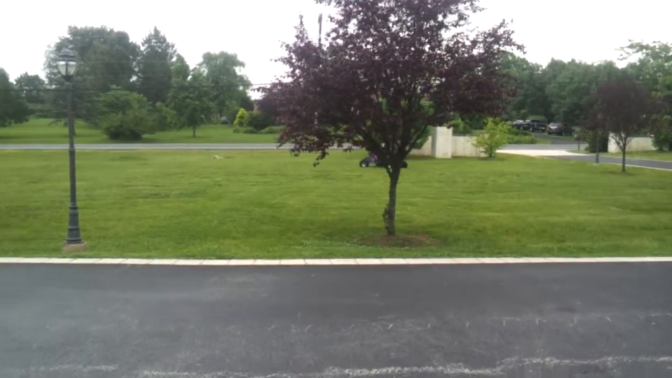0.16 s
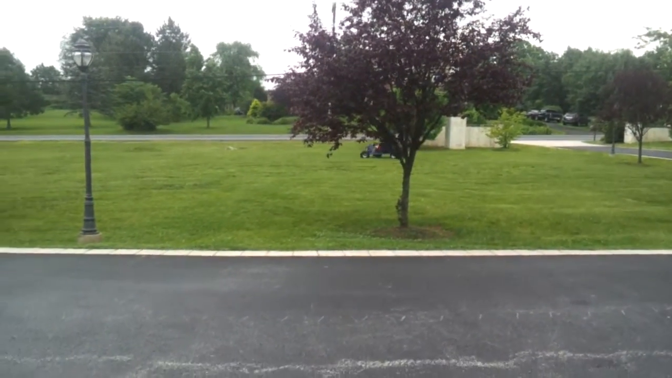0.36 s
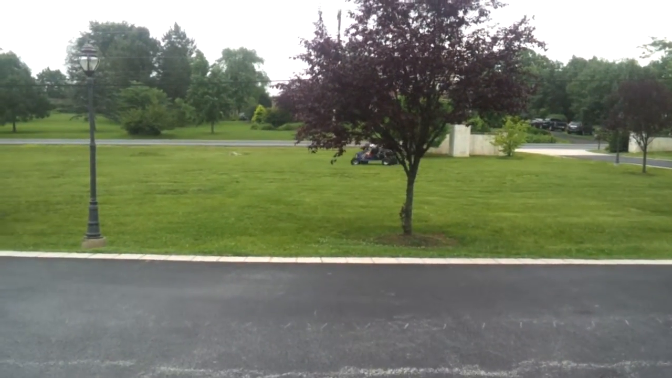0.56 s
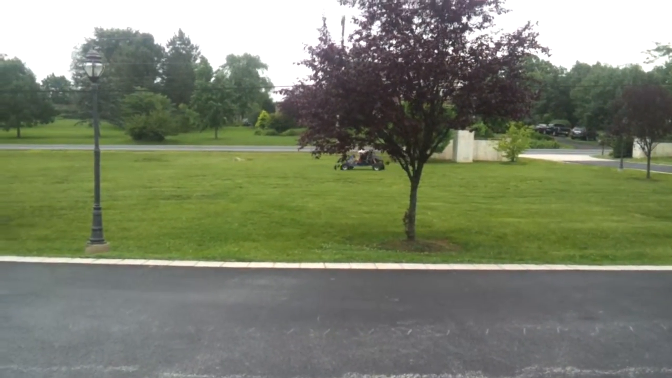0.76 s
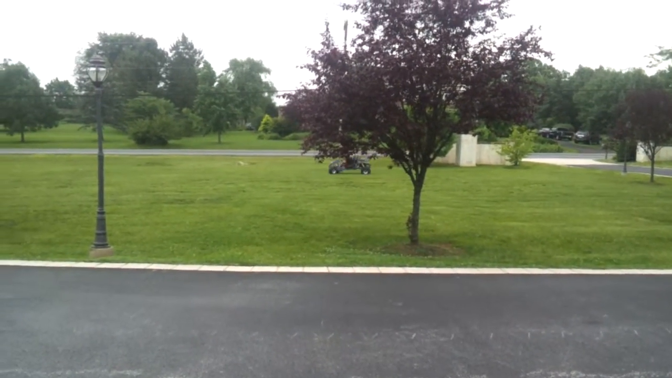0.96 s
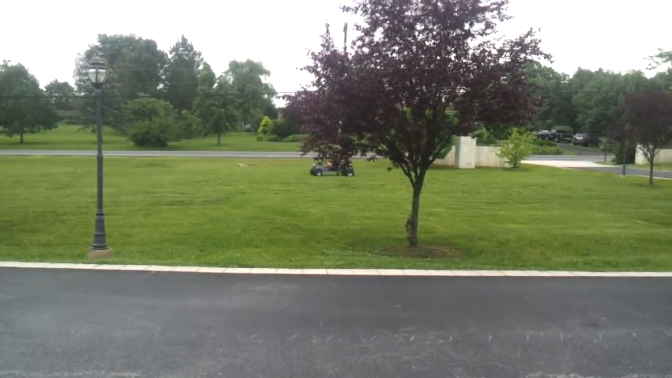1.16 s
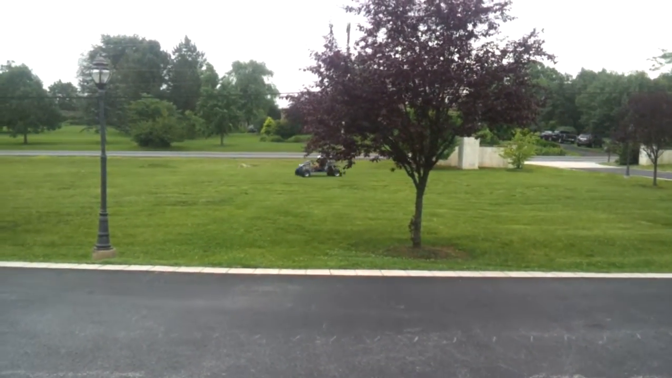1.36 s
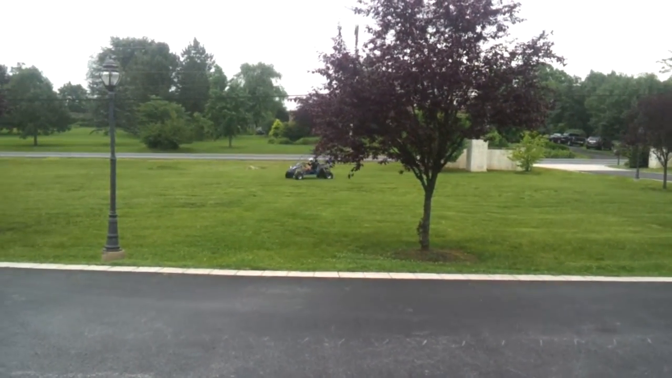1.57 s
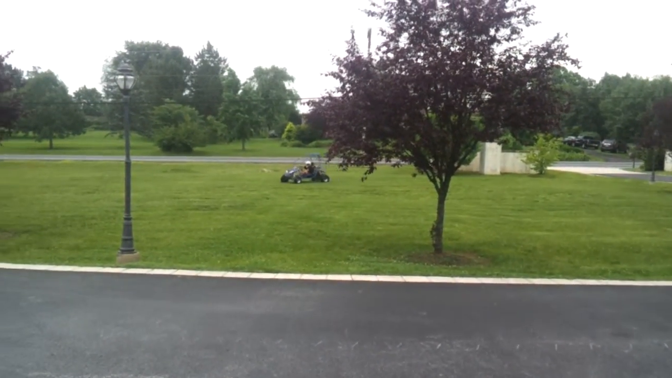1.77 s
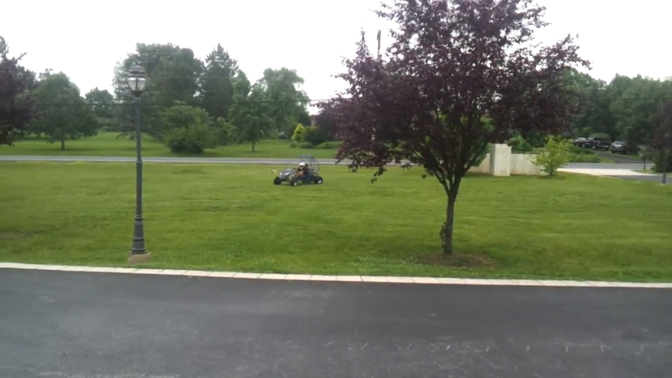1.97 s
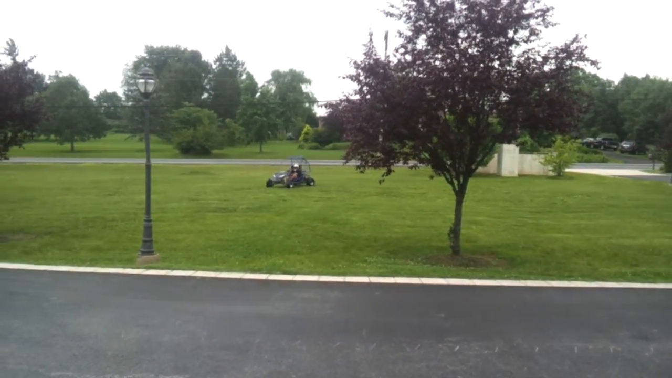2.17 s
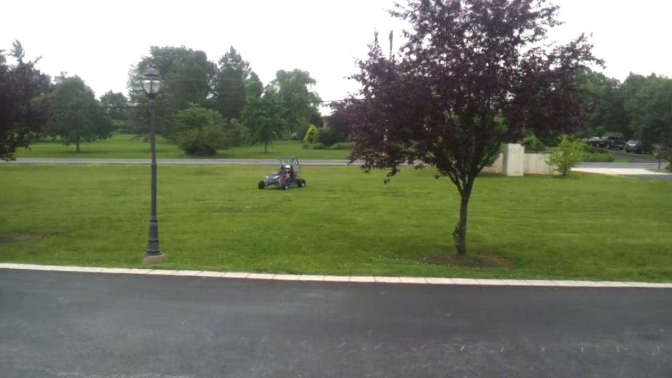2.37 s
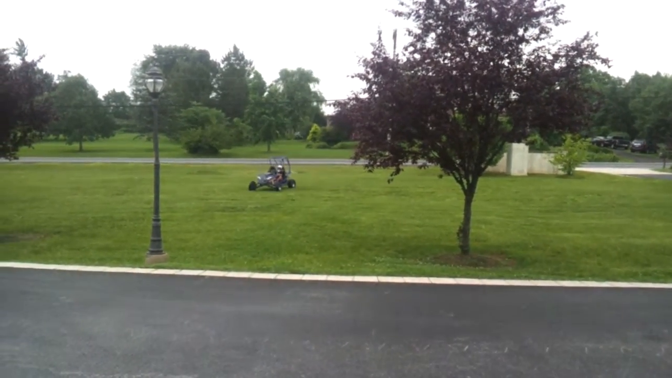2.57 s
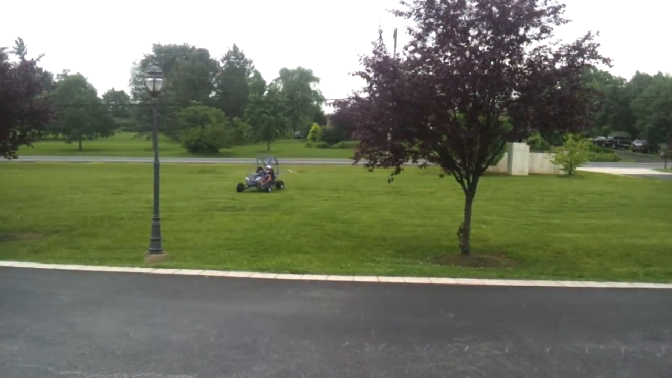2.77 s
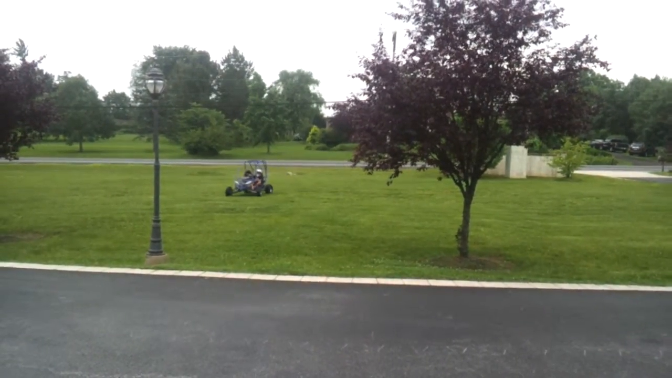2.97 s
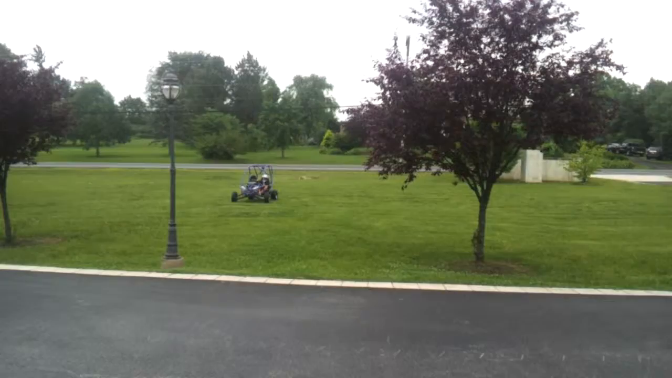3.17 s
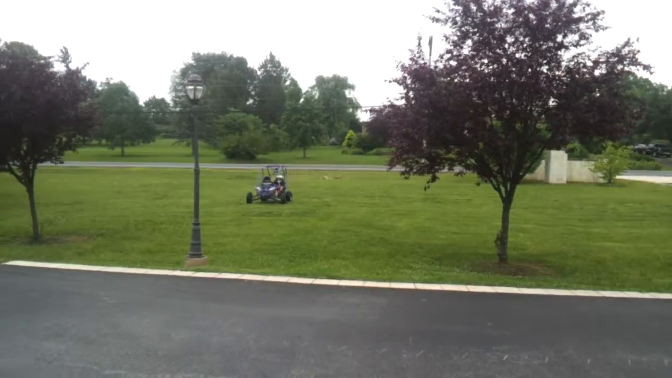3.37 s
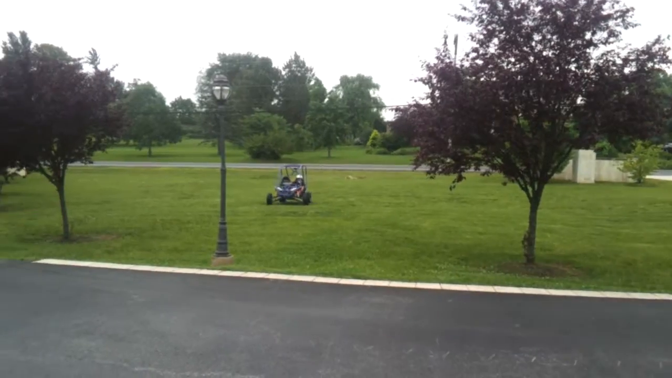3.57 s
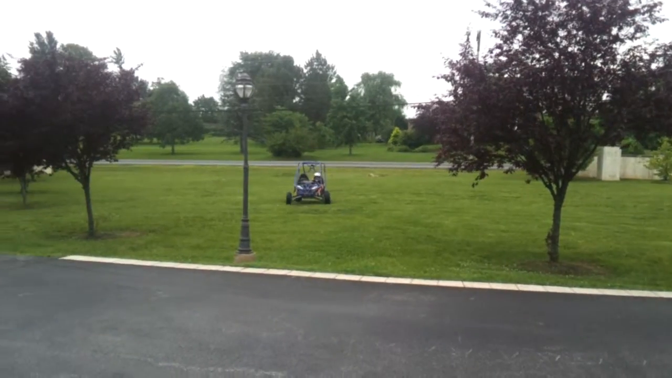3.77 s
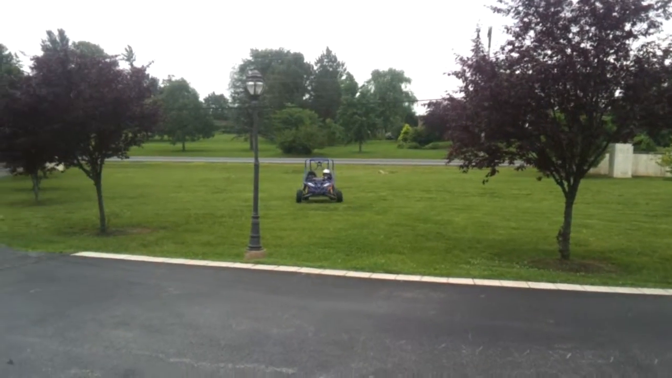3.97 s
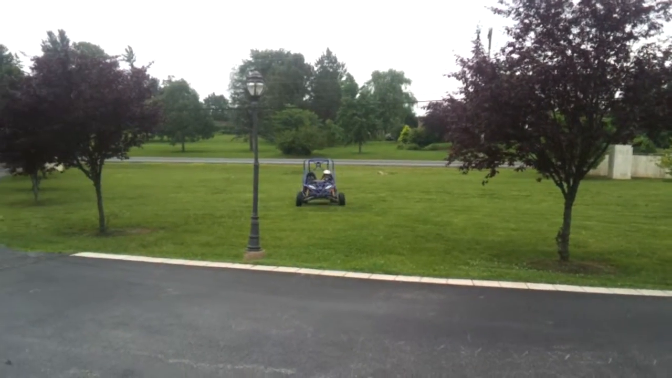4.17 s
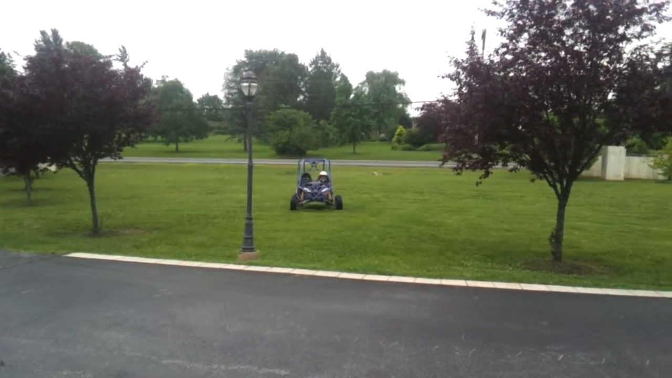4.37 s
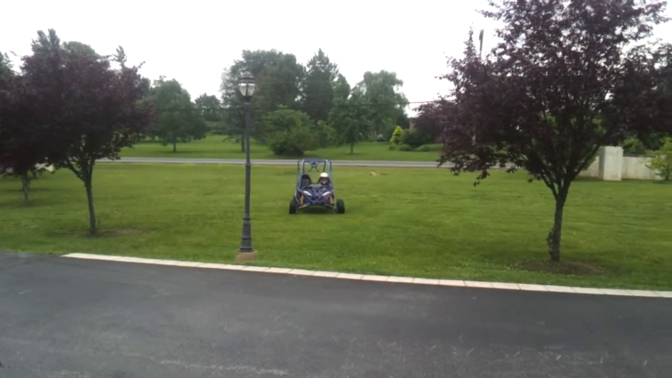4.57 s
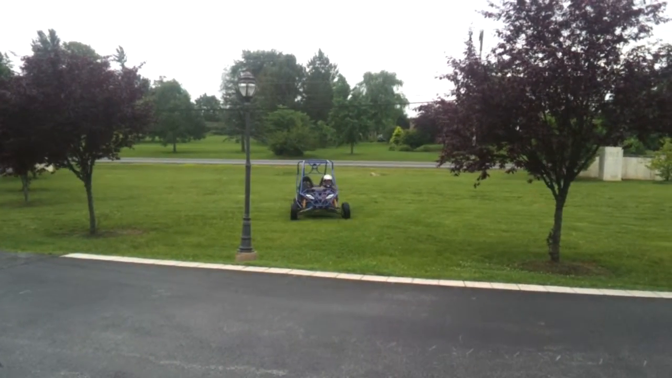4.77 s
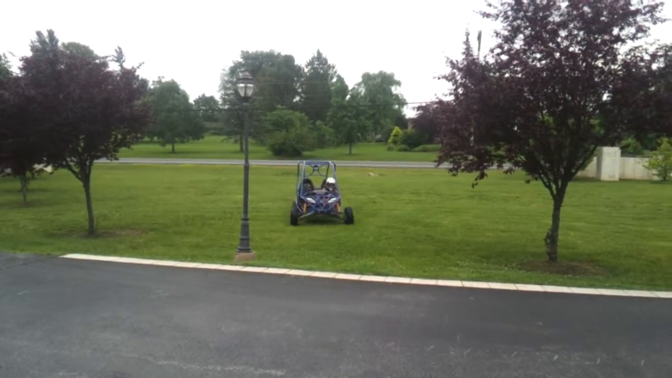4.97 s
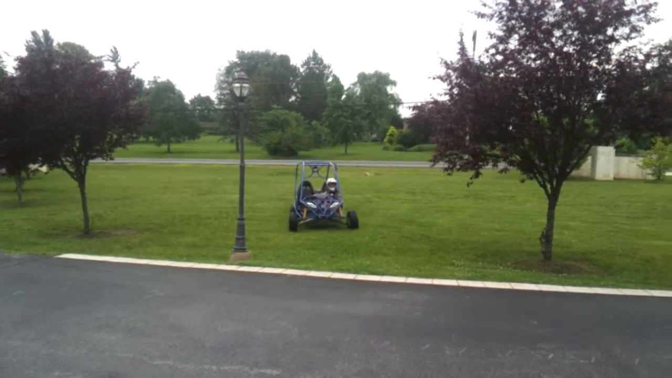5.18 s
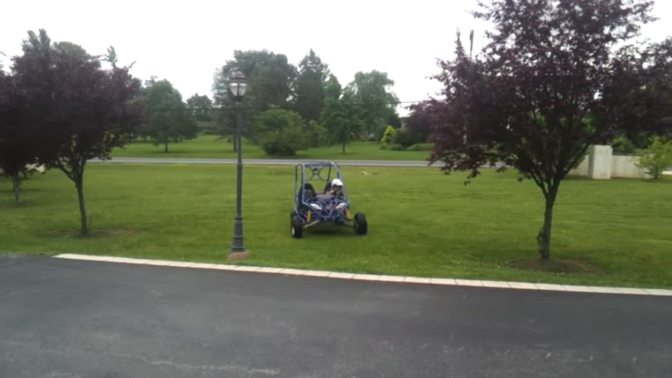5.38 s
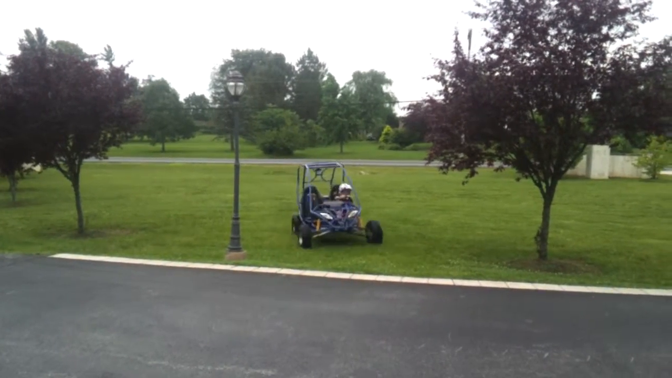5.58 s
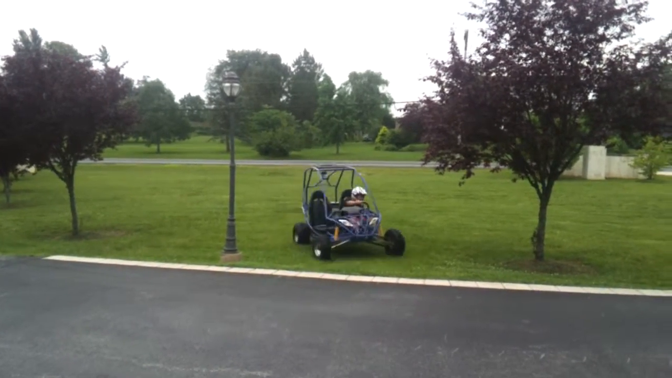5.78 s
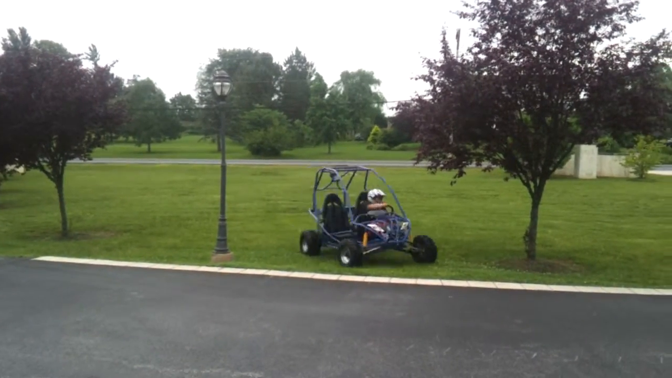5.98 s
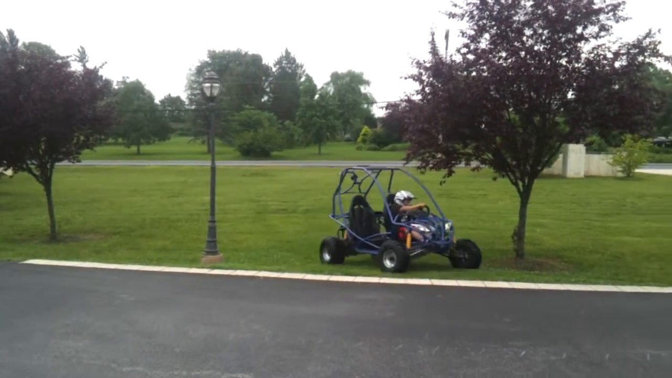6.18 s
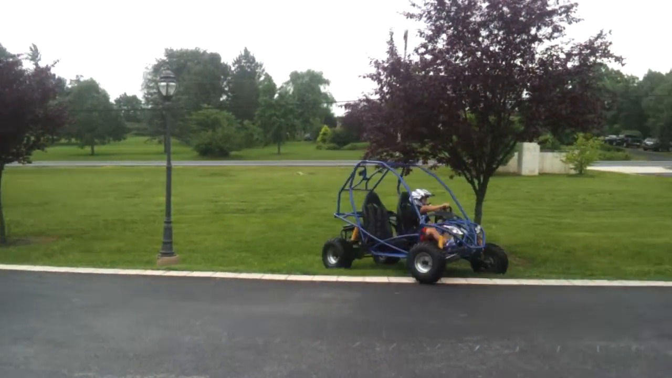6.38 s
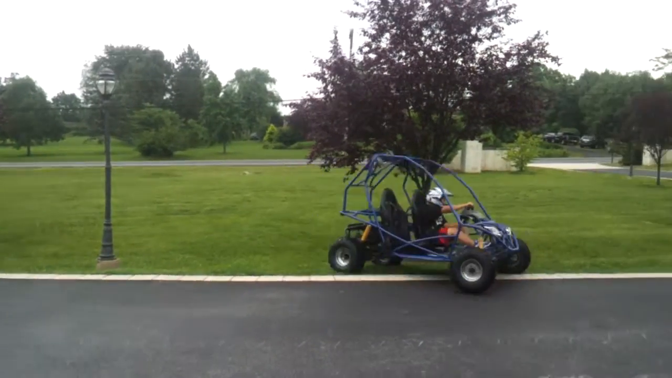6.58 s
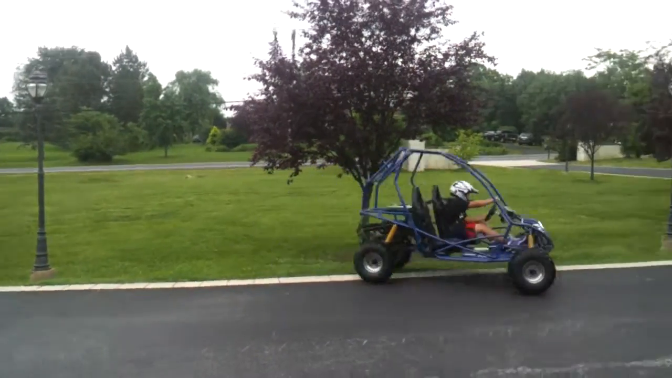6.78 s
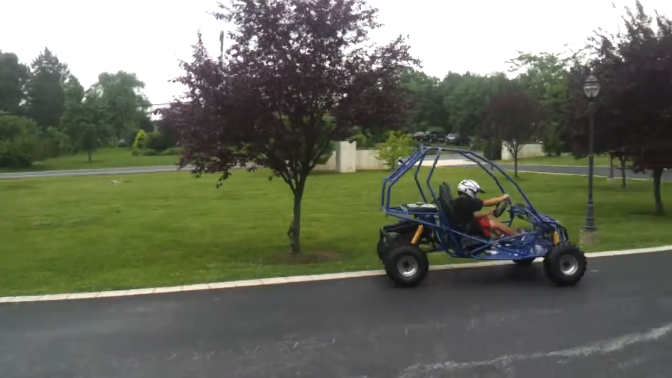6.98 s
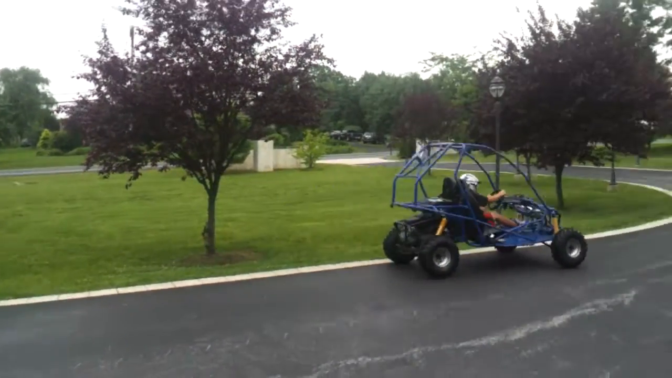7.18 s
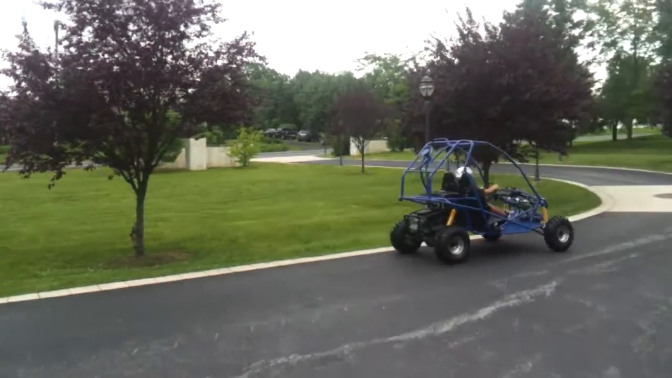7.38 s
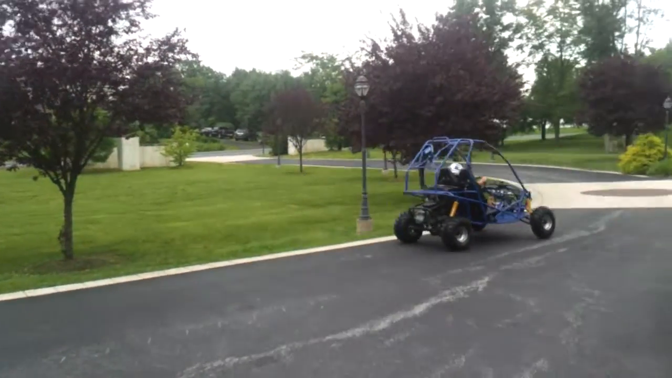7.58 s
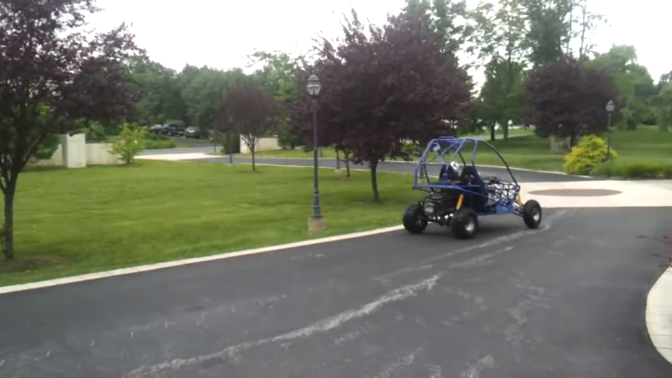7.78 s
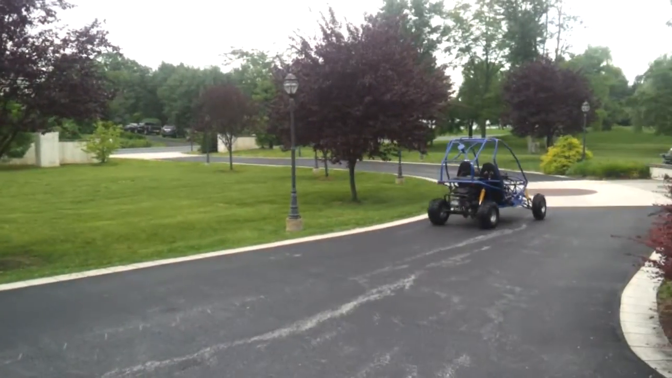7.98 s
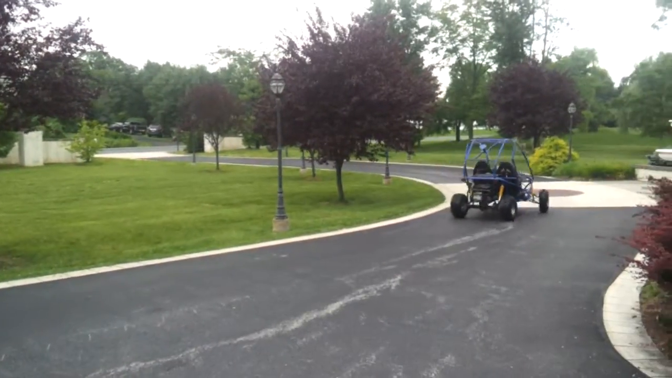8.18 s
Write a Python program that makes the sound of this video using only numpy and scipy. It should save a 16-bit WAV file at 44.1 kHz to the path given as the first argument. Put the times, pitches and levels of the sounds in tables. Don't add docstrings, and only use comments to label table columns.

```python
import sys
import numpy as np
from scipy import signal
from scipy.fft import rfft, irfft, next_fast_len
from scipy.io import wavfile
from scipy.ndimage import uniform_filter1d, map_coordinates

SR = 44100
rng = np.random.default_rng(int(sys.argv[2]) if len(sys.argv) > 2 else 0)


def boost_factor(decibels):
    exponent = np.asarray(decibels, float) / 20
    return 10 ** exponent


def transcribe(u):
    v = np.clip(np.atleast_2d(u).T, -1, 1)
    q = np.round(v * 32767).astype(np.int16)
    wavfile.write(sys.argv[1], SR, q)


N = 362943
STEP = 32

# time in seconds, loudness of its rush in dB,
# heading in degrees (0 = straight at the microphone).
COURSE = [(0, -38, -100), (.7, -38, -100), (1.0, -39.5, -91.5), (1.5, -39, -78), (2.6, -39.5, -53.5),
          (3.0, -41.5, -29), (3.9, -42, -13), (4.55, -39.5, -1), (4.8, -39.5, 3), (5.7, -36.5, 10),
          (6.1, -34, 33), (6.4, -34, 54), (6.7, -28, 82), (7.05, -27, 104), (7.25, -23, 126),
          (7.85, -26, 157.5), (8.05, -30, 164), (8.23, -33.5, 173)]
# time in seconds, share of knocks (0-1),
# boom of the body (0-1), pipe mouth in view (0-1).
FACING = [(0, .45, 0, 0.1), (.7, 0.4, 0, 0), (1.2, 0.15, 0.04, .3), (4.6, 0.15, 0.13, 0.48),
          (5.3, 0.32, 0.61, 0.24), (6.3, 0.57, 0.88, 0), (6.9, 0.32, .8, 0.13), (7.25, 0.62, 0.66, 0.29),
          (7.55, 0.57, 1, 0.7), (8, .45, .9, 0.82), (8.1, 0.6, 0.91, 0.14)]
# time in seconds, firing rate in Hz, effort in dB.
ENGINE = [(0, 45.46, -32.5), (.5, 45.9, -33.5), (.8, 44.63, -33), (1.24, 46.64, -32.5), (1.6, 46.84, -32.5),
          (2.0, 48.33, -31.5), (2.76, 50.57, -29), (2.86, 48.03, -29), (3.28, 47.38, -30.5),
          (3.47, 40.3, -33.5), (3.85, 43.12, -30.5), (3.99, 45.2, -30), (4.93, 47.82, -27.5),
          (6.13, 49.7, -24), (6.29, 46.74, -26), (6.85, 47.71, -21), (7.4, 48.32, -18.5), (8.0, 50.1, -22)]
# start in seconds, end in seconds, depth (0-1).
COASTS = [
    (.62, .74, 0.3),
    (.8, .87, 0.7),
    (2.86, 3.33, 0.75),
    (3.52, 3.87, 0.97),
    (4.76, 4.8, 0.6),
    (6.18, 6.8, 0.5),
]
# start in seconds, end in seconds, depth (0-1).
DRAGS = [
    (.38, .42, 0.4),
    (3.36, 3.46, 0.61),
    (4.62, 4.75, 0.75),
    (8.06, 8.4, 0.98),
]


def clock():
    return np.arange(0, N + STEP, STEP) / SR


def fine(slow):
    return np.interp(np.arange(N) / SR, clock(), slow)


def curves(rows):
    s, *cols = np.transpose(rows)
    return [np.interp(clock(), s, c) for c in cols]


def wobble(rate):
    knots = rng.standard_normal(int(N * rate / SR) + 4)
    return map_coordinates(knots, [clock() * rate])


def unit(x):
    return x / np.sqrt(np.mean(x ** 2) + 1e-20)


def filtered(x, response):
    m = next_fast_len(N + 8192)
    hz = np.fft.rfftfreq(m, 1 / SR)
    return irfft(rfft(x, m) * response(hz), m)[..., :N]


def coloured(x, spectrum, lo_hz=0, hi_hz=SR):
    hz, db = np.transpose(spectrum)

    def response(f):
        level_db = np.interp(np.log(f + 1), np.log(hz), db, -120, -120)
        return boost_factor(level_db) * (f >= lo_hz) * (f < hi_hz)

    return unit(filtered(x, response))


def ringing(x, hz, width):
    return unit(filtered(x, lambda f: (1j * f * width / (hz * hz - f * f + 1j * f * width)) ** 2))


def patchy(depth_db):
    z = signal.stft(rng.standard_normal(N + 512), nperseg=512)[2]
    field = uniform_filter1d(rng.standard_normal(z.shape), size=5, axis=0)
    field = uniform_filter1d(field, size=10, axis=1)
    return unit(signal.istft(z * boost_factor(depth_db * unit(field)), nperseg=512)[1][:N])


def pedal(spans):
    t = clock()
    change_s = 0.044
    return sum(depth * np.clip(np.minimum(t - a, b - t) / change_s + .5, 0, 1) for a, b, depth in spans)


def nearness():
    return np.clip((curves(COURSE)[0] + 38.2) / 8, 0, 1)


def seen(sides):
    side_headings = (-100, -60, 0, 120)
    return np.interp(curves(COURSE)[1], side_headings, sides)


def firing_hz():
    # time of the lowest speed in seconds, loss in %, slowing in seconds, recovery in seconds.
    ruts = [(.34, 8, .09, .14), (.6, 3, .09, .1), (.85, 3, .08, .05), (1.12, 1, .08, .1),
            (1.51, 2.5, .15, .12), (1.74, 2, .08, .11), (2.2, 2, .06, .06), (2.45, 2.5, .08, .06),
            (2.62, 4.5, .11, .12), (3.12, 2, .1, .1), (4.24, 1, .2, .2), (4.74, 14.5, .2, .19),
            (5.02, 9, .08, .14), (5.25, 4, .08, .09), (5.46, 3, .09, .08), (5.62, 6.5, .08, .16),
            (5.87, 5.5, .05, .16), (6.19, 1.8, .05, .09), (6.35, 4.5, .06, .45), (6.97, 7.5, .11, .1),
            (7.17, 3, .08, .08), (7.33, 4, .06, .1), (8.2, 13.5, .17, .5)]
    t = clock()
    loss = sum(np.interp(t, [s - fall, s, s + rise], [0, share, 0]) for s, share, fall, rise in ruts)
    return curves(ENGINE)[0] * (1 - loss / 100)


def crank():
    return 1.05 + np.cumsum(fine(firing_hz())) / SR + 0.0074 * fine(wobble(30))


def orders_db():
    # order, level against the effort in dB at each of the four headings.
    voice = [(2, -6.5, -4, -4, -4), (3, -9, -8, -9.5, -11.5), (4, -10, -10, -8.5, -10),
             (5, -4, -21, -10.5, -8.5), (6, -9.5, -11.5, -10, -9), (7, -20.5, -20.5, -11.5, -16)]
    # order, change coasting in dB, change dragged in dB.
    pedal_effect = [(2, -4, -11.5), (3, -14.5, 6), (4, -6.5, 2), (5, -0.5, -4.5), (6, -6.5, -6),
                    (7, -1.5, -0.5)]
    # time in seconds, order, change in dB, length in seconds.
    swells = [(.2, 4, 6, .1), (.87, 4, -12, .04), (1.85, 4, 4, 0.043), (2.06, 4, 2.5, .05),
              (2.16, 4, -15, .03), (2.36, 3, 7.5, 0.047), (2.75, 3, 4.5, .1), (2.4, 5, 1, .3),
              (1.6, 5, -4.5, 0.1), (.65, 5, -4.5, .08), (5.8, 6, 3, 0.062), (7.25, 2, 2.5, .15),
              (1.3, 2, 2.5, .25), (4.68, 3, -0.5, 0.044), (3.2, 4, 5.5, 0.07), (3.4, 7, 6.5, 0.085),
              (6.05, 4, -13, 0.073), (6.37, 5, 2, 0.071), (6.85, 4, 8.5, 0.057), (6.68, 3, -8.5, .06),
              (6.92, 3, -7, .07), (8.12, 3, 4, .05), (3.7, 5, 4.5, .1), (3.6, 2, 1, .08), (3.0, 3, -6, .08),
              (7.8, 4, 2.5, .15), (7.8, 7, 4, 0.098)]
    t, effort_db = clock(), curves(ENGINE)[1]
    coast, drag = pedal(COASTS), pedal(DRAGS)
    levels = []
    for (_, *sides), (_, coast_db, drag_db) in zip(voice, pedal_effect):
        levels.append(effort_db + seen(sides) + coast_db * coast + drag_db * drag)
    for s, order, db, length in swells:
        i = round(order) - 2
        levels[i] = levels[i] + db * np.exp(-.5 * ((t - s) / length) ** 2)
    return levels


def note(turns, near):
    # order, level against its common level in dB.
    crack = [(8, -8.5), (9, -19.5), (10, -12.5), (11, -14.5), (12, -7.5), (13, -15.5), (14, -14),
             (16, -11.5), (19, -21.5), (24, -14)]
    low_db = orders_db()
    levels = [(0.99, low_db[0] - 15.5 + 4 * near)]
    levels += list(zip(range(2, 8), low_db))
    crack_db = curves(COURSE)[0] - 20 + 9 * near + 12 * curves(FACING)[2]
    levels += [(k, crack_db + np.interp(k, *np.transpose(crack))) for k in range(8, 25)]
    loose = 1 - 0.25 * near
    tone = np.zeros(N)
    for k, db in levels:
        unsteady_db = (1.34 + 0.13 * k) * loose * wobble(14)
        lead = .03 * k * k if k < 8 else .62 * k - np.pi
        drift = (1 - near) * (np.pi / 2 * (k % 2) + .8 * wobble(1.3))
        jitter = .06 * k * loose * wobble(12)
        tone -= fine(boost_factor(db + unsteady_db)) * np.cos(2 * np.pi * k * turns + fine(lead + drift + jitter))
    return np.sqrt(2) * tone


def turbulence(near):
    # frequency in Hz, level in dB per Hz.
    air = [(22, -14.5), (42, -7.5), (70, -0.5), (120, -2.5), (200, -5.5), (330, -11.5), (420, -24),
           (700, -40)]
    level_db = -40.5 + 4 * near + 3.5 * pedal(DRAGS) + 2.5 * wobble(8)
    return fine(boost_factor(level_db)) * coloured(rng.standard_normal(N), air)


def puffs(turns, decay, scatter_db):
    turns = turns + .07
    sizes = boost_factor(scatter_db * rng.standard_normal(600))
    part = turns % 1
    return sizes[turns.astype(int)] * np.exp(-part / decay) * (1 - np.exp(-part / 0.069))


def gear_db():
    # heading in degrees, body drone against the rush in dB, rattle against the rush in dB.
    gear_sides = [(-100, -2.5, -10), (-54, -2, -9.5), (-16.5, 1.5, -10.5), (0, 1, -7.5), (36, 0.5, -5.5),
                  (79, -1.5, -8), (155, -4.5, -8), (168.5, 2.5, -5)]
    loud_db, heading = curves(COURSE)
    sides, drone_db, rattle_db = np.transpose(gear_sides)
    own = np.interp(heading, sides, drone_db), 0, np.interp(heading, sides, rattle_db)
    return [loud_db + db + 0.45 * wobble(9) for db in own]


def gear(turns, near, band_db):
    # frequency in Hz, level in dB per Hz.
    far_colour = [(220, -30), (370, -3.5), (573, -6.5), (877, 2.5), (1330, -1), (1660, 1), (2190, -0.5),
                  (2540, -2), (2880, -9.5), (3220, -8.5), (3940, -7.5), (4300, -6.5), (5450, -18.5),
                  (6180, -23), (7360, -34), (9570, -68), (16200, -120)]
    # frequency in Hz, level in dB per Hz.
    near_colour = [(240, -7), (400, 1), (452, -4.5), (584, -0.5), (1150, -6.5), (1270, -5.5), (1460, -4),
                   (2280, -4), (2580, -3), (2920, -11), (3210, -6.5), (4050, -11.5), (4410, -9.5),
                   (6060, -16.5), (7360, -34.5), (9570, -68.5), (16200, -120)]
    split_hz = (1300, 3600)
    share, boom, _ = np.clip(curves(FACING), 0, 1)
    edges = (0, *split_hz, SR)
    out = np.zeros(N)
    for k, bias in enumerate([.4, .5, .9]):
        knock = unit(rng.standard_normal(N) * puffs(turns, 0.12, 1.8))
        drive = fine(np.sqrt(1 - share)) * patchy(0.75) + fine(bias * share) * knock
        far = coloured(drive, far_colour, edges[k], edges[k + 1])
        close = coloured(drive, near_colour, edges[k], edges[k + 1])
        mix = near if k else boom
        out += fine(boost_factor(band_db[k]) * (1 - mix)) * far
        out += fine(boost_factor(band_db[k]) * mix) * close
    return out


def casing(turns, band_db):
    # frequency in Hz, width in Hz,
    # level in dB, time when loudest in seconds, spread in seconds.
    casing_modes = [(2060, 130, -37, 6.93, .3), (2563, 160, -31, 7.37, 0.35),
                    (2800, 800, -31.5, 7.22, 0.15), (3270, 260, -29, 7.2, 0.13),
                    (5255, 200, -38, 7.23, 0.09), (6020, 150, -40, 7.363, 0.22),
                    (4499, 240, -35.5, 7.75, 0.2), (3730, 600, -36, 7.85, 0.23),
                    (633, 89, -38.5, 7.56, 0.3), (4300, 350, -54, .5, 0.22), (5100, 500, -55, .52, 0.08),
                    (5930, 300, -59.5, .5, 0.11), (3381, 300, -40, 6.5, 0.12),
                    (4400, 900, -47.5, 0.09, .07), (5700, 890, -38.5, 7.527, 0.28)]
    # frequency in Hz, width in Hz, level against its band in dB.
    shroud = [(2606, 230, -12), (4344, 190, -7)]
    ring, t = np.zeros(N), clock()
    for hz, width, db, s, spread in casing_modes:
        blows = rng.standard_normal(N) * puffs(turns, 0.11, 1.3)
        facing = np.exp(-.5 * ((t - s) / spread) ** 2)
        ring += fine(boost_factor(db) * facing) * ringing(blows, hz, 1.2 * width)
    for level_db, (hz, width, db) in zip(band_db[1:], shroud):
        ring += fine(boost_factor(level_db + db)) * ringing(patchy(2.2), hz, width)
    return ring


def bumps():
    # time in seconds, level in dB, length in seconds.
    edge_hits = [
        (6.335, -31, 0.036),
        (6.622, -33.5, 0.025),
        (6.848, -26, .03),
        (7.292, -32, .025),
    ]
    # frequency in Hz, level in dB per Hz.
    frame = [(300, -34.5), (420, -12.5), (560, -1), (800, -1.5), (1000, -14.5), (1400, -30)]
    t = np.arange(N) / SR
    shudder = sum(boost_factor(db) * np.exp(-.5 * ((t - s) / length) ** 2) for s, db, length in edge_hits)
    return shudder * coloured(rng.standard_normal(N), frame)


def squeaks():
    # start in seconds, peak in dB, first frequency in Hz, last frequency in Hz, length in seconds.
    whistles = [
        (0.962, -55, 5900, 6300, 0.085),
        (1.024, -57, 6100, 6250, .05),
        (3.326, -39, 4340, 4400, 0.016),
        (3.83, -43, 3870, 3880, 0.026),
    ]
    out = np.zeros(N)
    for s, db, from_hz, to_hz, length in whistles:
        n = int(length * SR)
        hz = np.linspace(from_hz, to_hz, n) + 45 * fine(wobble(150))[:n]
        whistle = np.sin(2 * np.pi * np.cumsum(hz) / SR)
        out[round(s * SR):][:n] += boost_factor(db) * np.hanning(n) * whistle
    return out


def scene():
    turns, near, band_db = crank(), nearness(), gear_db()
    engine = note(turns, near) + turbulence(near)
    body = gear(turns, near, band_db) + casing(turns, band_db)
    return (engine + body + bumps() + squeaks())[None]


def roll_off(x):
    return signal.sosfilt(signal.butter(12, 7510, fs=SR, output="sos"), x)


def record(dry):
    hz, t, z = signal.stft(dry, SR, nperseg=1024)
    edge_hz = 7250 + 100 * rng.standard_normal(100)[(t * 9).astype(int)]
    kept = signal.istft(z * (hz[:, None] < edge_hz), SR, nperseg=1024)[1][:, :N]
    return roll_off(kept)


dry = scene()
out = record(dry)
transcribe(out)
```